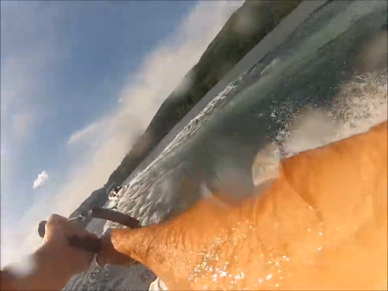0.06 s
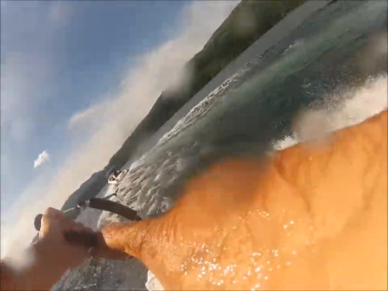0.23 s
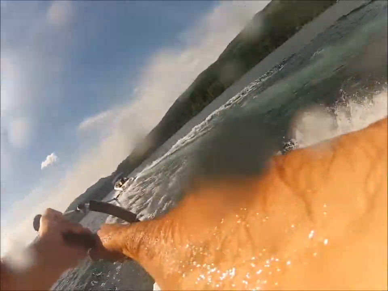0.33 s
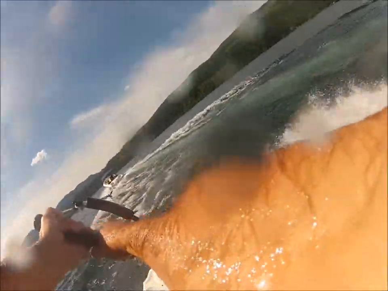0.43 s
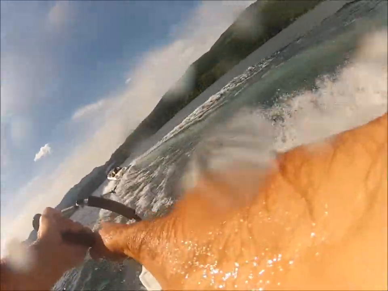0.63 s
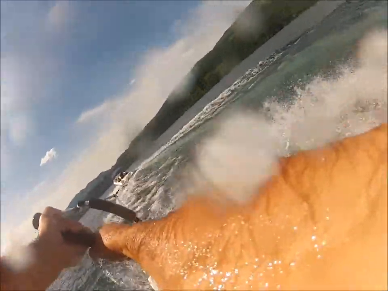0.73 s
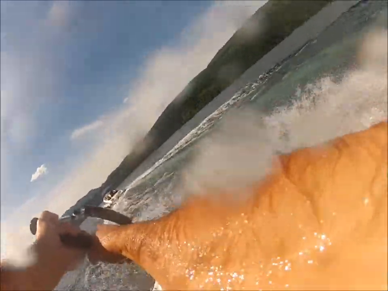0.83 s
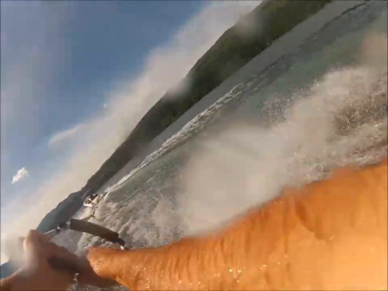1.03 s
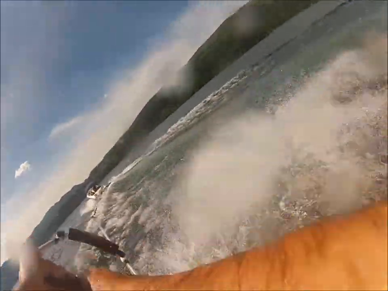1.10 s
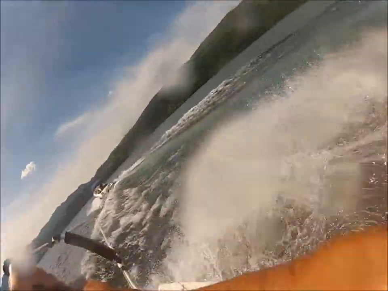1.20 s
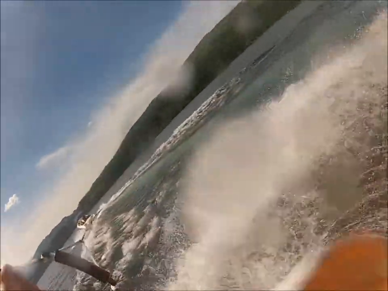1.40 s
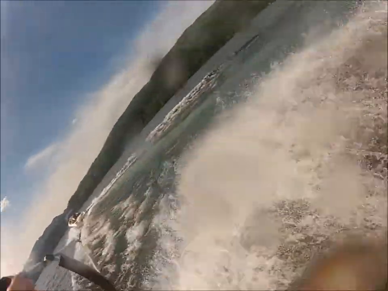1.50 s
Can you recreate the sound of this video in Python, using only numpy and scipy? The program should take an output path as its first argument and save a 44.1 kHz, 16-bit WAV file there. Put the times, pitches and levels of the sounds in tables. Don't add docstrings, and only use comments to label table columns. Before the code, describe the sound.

A boat engine throbs steadily, muffled, while water drops crack hard against a small camera case

```python
import sys
import numpy as np
from scipy import signal
from scipy.io import wavfile
from scipy.ndimage import uniform_filter1d, map_coordinates

SR = 44100
rng = np.random.default_rng(int(sys.argv[2]) if len(sys.argv) > 2 else 0)


def pcm_store(signal):
    levels = np.round(np.clip(np.atleast_2d(signal), -1, 1) * 32767)
    wavfile.write(sys.argv[1], SR, levels.astype(np.int16).T)


def voltage_ratio(level):
    return 10 ** (np.asarray(level, float) / 20)


N = 68355


def level(x, db):
    return x * voltage_ratio(db) / np.sqrt(np.mean(x ** 2))


def band(x, hz, width_hz):
    return signal.lfilter(*signal.iirpeak(hz, hz / width_hz, fs=SR), x)


def ring(x, hz, t60):
    pole = np.exp(2j * np.pi * hz / SR - np.log(1000) / (t60 * SR))
    return signal.lfilter([1], [1, -pole], x).imag


def walk(rate):
    k = int(SR / rate)
    held = np.repeat(rng.standard_normal(N // k + 1), k)
    return 1.12 * uniform_filter1d(uniform_filter1d(held, k), k)[:N]


def hump(start_s, length_s):
    phase = np.clip((np.arange(N) / SR - start_s) / length_s, 0, 1)
    return np.sin(np.pi * phase) ** 2


def cut(x, hz, kind):
    return signal.sosfilt(signal.butter(4, hz, kind, fs=SR, output="sos"), x)


def engine(t):
    # t/s, firing rate/Hz
    firing_rate = [(0, 99.5), (.28, 98.95), (.5, 99.55), (.75, 99.95), (1.0, 100.15), (1.22, 100.7),
                   (1.33, 98.8), (1.45, 97.3), (1.55, 97)]
    # level/dB, delay/s, puff length/s
    cylinders = [(0.5, 0, .0028), (-4, .0001, 0.0043), (-0.5, -.0002, 0.0027), (2, .0001, 0.0024)]
    first_firing_s, jitter_s, scatter_db = .0022, .00012, 1.2
    suction_db, suction_lead_s = -8, 0.00186
    pipe_hz, pipe_width_hz, pipe_db = 461, 100, -0.5

    firings = np.cumsum(np.interp(t, *np.array(firing_rate).T)) / SR
    count = np.arange(int(firings[-1]))
    time_chance, level_chance = rng.standard_normal((N // 200, 2))[count].T
    at = np.interp(count, firings, t) + first_firing_s + jitter_s * time_chance
    puffs = 0
    for k, (db, late, length) in enumerate(cylinders):
        mine = count % len(cylinders) == k
        places = np.clip((at[mine] + late) * SR, 0, N - 1).astype(int)
        clicks = np.bincount(places, voltage_ratio(db + scatter_db * level_chance[mine]), N)
        puffs = puffs + np.convolve(clicks, np.hanning(int(length * SR)), "same")
    puffs = puffs - voltage_ratio(suction_db) * np.roll(puffs, -int(suction_lead_s * SR))
    pipe = voltage_ratio(pipe_db) * band(puffs, pipe_hz, pipe_width_hz)
    muffled = cut(puffs - puffs.mean() + pipe, 525, "low")
    return level(muffled, -38.5)


def drops():
    # f/Hz, level/dB, t60/s
    shell_modes = [(830, -15, .022), (1100, -9, .012), (1570, -7, .014), (1890, -6, .010), (2200, -4, .007),
                   (2480, 3, .007), (2800, -5, .006), (3500, -5, .006)]
    # t/s, level/dB, length/s, tilt/(dB per octave)
    impacts = [(0.049, -26.5, 0.0042, 9), (0.57, -29.5, 0.0049, 8.5), (0.2355, -5.5, 0.00093, -13),
               (0.2404, -5, 0.0014, 0), (0.274, -31, 0.0034, 0), (.391, -25, .003, -20),
               (0.4311, 2, 0.0025, -3.5), (0.817, -52, .003, -4), (0.996, -23, 0.013, -10.5),
               (1.0223, 5, .0036, 18), (1.08, -9, 0.00104, -4), (1.0814, -25, 0.0036, -9),
               (1.1, -29, 0.0057, -28), (1.2265, 5.5, 0.0055, -5.5), (1.246, -31, 0.0061, -32),
               (1.285, -25, 0.0089, -15), (1.3008, -21, 0.0014, -8), (1.408, -29.5, 0.0023, -27),
               (1.507, -28.5, 0.017, -18.5), (1.525, -21, 0.0051, -2.5), (1.542, -28, 0.004, -10)]
    snap_db, snap_width_hz = 25.5, 2060
    limit = 0.83
    size = 4096

    out = np.zeros(N)
    t = np.arange(size) / SR
    for at, db, length, tilt in impacts:
        rattle = rng.standard_normal(size) * (t < length) * (1 - .5 * t / length)
        colour = 2 * rng.standard_normal(len(shell_modes))
        crack = 0
        for (hz, gain, t60), c in zip(shell_modes, colour):
            crack = crack + voltage_ratio(gain + tilt * np.log2(hz / 2000) + c) * ring(rattle, hz, t60)
        snap_hz = 2450 * 2 ** (tilt / 10)
        snap = band(band(rattle, snap_hz, snap_width_hz), snap_hz, snap_width_hz)
        crack = crack + voltage_ratio(snap_db) * snap
        crack = voltage_ratio(db) * crack / np.abs(crack).max()
        crack = limit * np.tanh(crack / limit)
        i = int(at * SR)
        out[i:i + size] += crack[:N - i]
    return cut(out, 640, "high")


def jolts():
    # t/s, push, length/s
    pushes = [
        (.2678, 0.32, .0056),
        (0.391, 0.23, 0.004),
        (.433, 0.056, .006),
        (0.823, 0.073, 0.0032),
        (0.995, 0.14, 0.0052),
        (1.022, 0.053, 0.0051),
        (1.228, 0.17, 0.00305),
    ]
    # t/s, push, length/s, lasting push on the spring
    blow = [
        (.2255, -.1, .016, -.12),
        (.2332, -2.0, .0028, 0),
        (.2346, .62, .0095, .78),
    ]
    # t/s, level/dB, f/Hz, t60/s
    knocks = [
        (0.048, -31, 161, .06),
        (0.078, -27.5, 173, 0.056),
        (1.0, -23, 104, 0.17),
        (1.08, -25.5, 181, 0.14),
        (1.149, -25, 143, 0.068),
        (1.402, -24.5, 110, 0.084),
        (1.441, -28.5, 179, 0.15),
        (1.466, -32, 111, 0.096),
    ]
    spring_hz, spring_width_hz = 38, 20

    push = sum(size * hump(at, length) for at, size, length in pushes)
    dents = 0
    for at, size, length, stay in blow:
        push = push + stay * np.cumsum(hump(at, length / 2)) / (length / 4 * SR)
        dents = dents + size * hump(at, length)
    w, q = 2 * np.pi * spring_hz, spring_hz / spring_width_hz
    swing = signal.lfilter(*signal.bilinear([1, 0, 0], [1, w / q, w * w], SR), push)
    out = swing + dents
    for at, db, hz, t60 in knocks:
        knock = ring(hump(at, .5 / hz), hz, t60)
        out = out + voltage_ratio(db) * knock / np.abs(knock).max()
    return out


def spray():
    # f/Hz, width/Hz, level/dB
    air_modes = [(867, 123, -3), (1108, 195, 1.5), (1630, 180, -5.5), (1870, 650, -7), (2350, 337, 0),
                 (3436, 310, -3)]
    swell = walk(6.2)
    grains = voltage_ratio(2.73 * rng.exponential(size=N))
    out = 0
    for hz, width_hz, db in air_modes:
        broad_hz = 1.43 * width_hz
        hiss = grains * rng.standard_normal(N)
        out = out + voltage_ratio(db) * band(band(hiss, hz, broad_hz), hz, broad_hz)
    return level(cut(out, 700, "high") * voltage_ratio(-0.76 * swell), -41.5)


def wind(t):
    # f/Hz, level/dB
    spectrum = [(25, 11), (60, 0.5), (120, -2.5), (200, -3.5), (400, -11), (650, -30)]
    # t/s, level/dB
    gusts = [(0, -38.5), (.3, -38), (.6, -37.5), (.9, -37.5), (1.1, -32.5), (1.3, -33.5), (1.45, -36.5),
             (1.55, -27)]
    lurch = walk(4.6)
    hzs, dbs = np.array(spectrum).T
    out = 0
    for hz in 20 * 2 ** np.arange(0, 5.1, .5):
        db = np.interp(np.log(hz), np.log(hzs), dbs) + 3 * lurch + 2.5 * walk(hz / 8)
        noise = rng.standard_normal(N)
        out = out + voltage_ratio(db) * band(band(noise, hz, hz / 2.17), hz, hz / 2.17)
    return level(out, 0) * voltage_ratio(np.interp(t, *np.array(gusts).T))


def scene():
    duck_db, duck_s = -6.5, 0.06
    t = np.arange(N) / SR
    hits = drops()
    fade = np.exp(-1 / (duck_s * SR))
    duck = np.minimum(signal.lfilter([30 * (1 - fade)], [1, -fade], np.abs(hits)), 1)
    steady = engine(t) + spray() + wind(t)
    return (steady * voltage_ratio(duck_db * duck) + hits + jolts())[None]


def top_cut(x):
    return signal.sosfilt(signal.butter(12, 16460, fs=SR, output="sos"), x)


def record(dry):
    soft = signal.sosfiltfilt(signal.butter(6, 4300, fs=SR, output="sos"), dry)
    sample_places = np.arange(0, N + 8, SR / 8000)
    steps = np.clip(map_coordinates(soft[0], [sample_places], mode="nearest"), -1.05, 1.05)
    held = signal.resample_poly(np.repeat(steps, 6), 147, 160)[:N]
    top = signal.sosfiltfilt(signal.ellip(6, .1, 22, 15550, fs=SR, output="sos"), held)
    return top_cut(top[None])


dry = scene()
out = record(dry)
pcm_store(out)
```